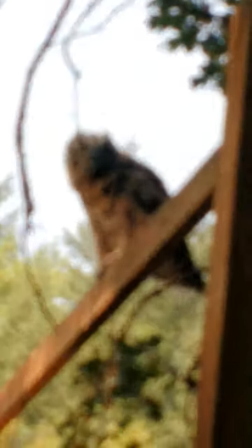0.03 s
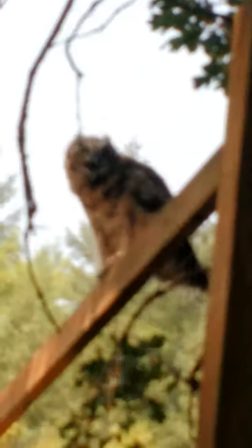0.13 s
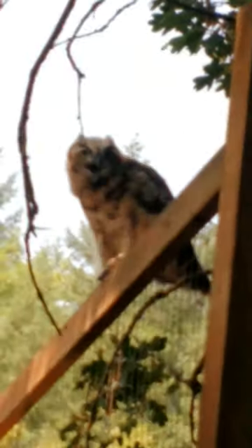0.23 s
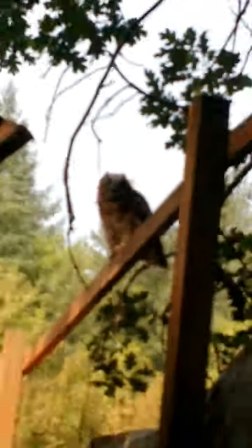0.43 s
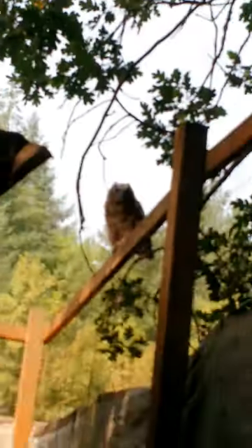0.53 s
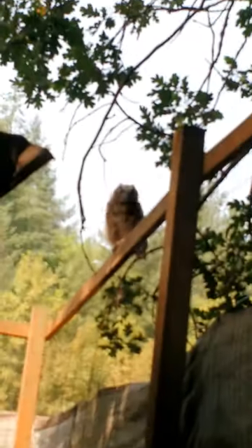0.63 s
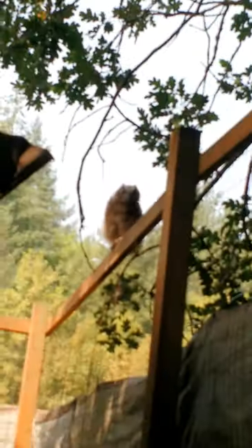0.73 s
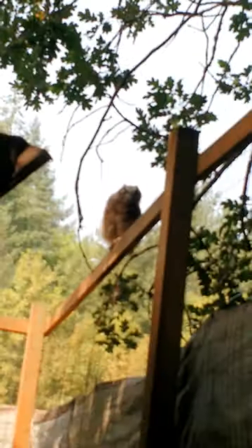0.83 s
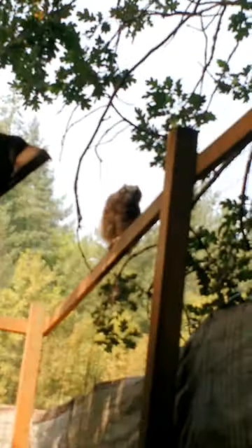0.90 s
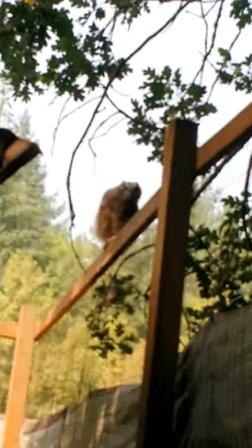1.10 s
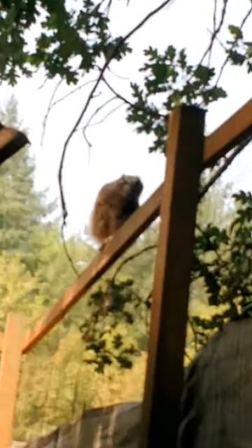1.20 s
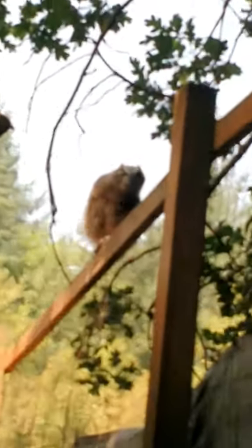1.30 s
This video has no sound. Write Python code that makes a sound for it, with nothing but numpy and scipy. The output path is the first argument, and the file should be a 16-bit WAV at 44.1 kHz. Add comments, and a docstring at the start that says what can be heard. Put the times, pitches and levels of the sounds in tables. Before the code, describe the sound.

A young owl gives one harsh, raspy screech over a quiet outdoor background.

```python
"""A stereo microphone at the edge of a wood, facing a young owl on a wooden beam.
Leaves stir over a soft far-off rush and a little wind. Then the owl gives one begging screech:
air rasps through a narrow resonance near 3 kHz, catches into a rough whistle at the height of the
call and falls away, thrown back by the beam, the yard and the trees. About a second in, a hand
softly bumps the microphone and the leaves stir once more."""
import sys
import numpy as np
from scipy import signal
from scipy.fft import rfft, irfft
from scipy.io import wavfile

SR = 44100
rng = np.random.default_rng(int(sys.argv[2]) if len(sys.argv) > 2 else 0)


def generate_wav(sig):
    """Save sig (samples, or channels by samples) to the path in sys.argv[1] as 16-bit PCM at SR."""
    pcm = np.round(np.clip(np.atleast_2d(sig).T, -1, 1) * 32767).astype(np.int16)
    wavfile.write(sys.argv[1], SR, pcm)


N = 59535
TIME = np.arange(N) / SR
LEFT_RIGHT = np.array([[1], [-1]])


# The resonance of the call, at the beak: (time [s], pitch [Hz])
CALL_PITCH = [(.16, 2500), (.178, 3078), (.245, 3162), (.28, 3091), (.34, 3045), (.37, 3170), (.387, 2956),
              (.43, 3099), (.465, 3233), (.54, 3382), (.578, 3247), (.612, 2598)]
# How hard the owl pushes: (time [s], level [dB])
CALL_EFFORT = [(.15, -64), (.168, -32.5), (.22, -24), (.28, -18), (.34, -17.5), (.46, -17.5), (.53, -19.5),
               (0.584, -22), (0.607, -31.5), (0.632, -50)]
# The whistle breaking through the rasp: (time [s], level [dB])
WHISTLE_LEVEL = [(.17, -39.5), (.225, -27), (.33, -27.5), (0.378, -28.5), (0.386, -15.5), (.425, -19),
                 (.465, -15), (0.499, -14.5), (0.548, -24), (.583, -20.5), (.61, -43.5), (.635, -80)]

def screech():
    """The owl on its beam: one push of air drives rasp and hiss, and a whistle breaks through."""
    pitch, = in_time(CALL_PITCH)
    effort_db, = in_time(CALL_EFFORT)
    whistle_db, = in_time(WHISTLE_LEVEL)
    whistling = from_db(whistle_db) * (TIME > WHISTLE_LEVEL[0][0])
    breath = from_db(effort_db) * rasp(pitch, whistling / whistling.max()) + beak_hiss(effort_db)
    sounding = (TIME > CALL_EFFORT[0][0]) & (TIME < CALL_EFFORT[-1][0])
    return sounding * (breath + whistling * whistle(pitch))


# The octave growing through the call: (time [s], level relative to the effort [dB])
OCTAVE_LEVEL = [(.17, -45.5), (.33, -23), (.45, -23.5), (.56, -21.5)]

def rasp(pitch, whistle_share, below_hz=70, lost_to_whistle=.38, beak_hz=4130):
    """Air rings just under the pitch, at the octave and in the fixed resonance of the open beak."""
    octave_db, = in_time(OCTAVE_LEVEL)
    core = from_db(-1.5) * resonant_air(pitch - below_hz, width_hz=485)
    octave = from_db(octave_db) * resonant_air(2 * pitch, width_hz=480)
    beak = from_db(-19) * resonant_air(np.full(N, beak_hz), width_hz=150)
    return core * (1 - lost_to_whistle * whistle_share) + octave + beak


AIR_FLUTTER_HZ = 166.8

def whistle(pitch, jitter_hz=33.1, shimmer_db=1.25, octave_db=-27):
    """A tone and its faint octave, roughened in pitch and level by the uneven airflow."""
    phase = turning(pitch + jitter_hz * flutter(AIR_FLUTTER_HZ))
    tone = np.sin(phase) + from_db(octave_db) * np.sin(2 * phase)
    return rms_one(tone * from_db(shimmer_db * flutter(AIR_FLUTTER_HZ)))


# Hiss at the open beak: (frequency [Hz], relative density [dB])
HISS_SPECTRUM = [(1200, -27.5), (1900, -13), (2400, -8.5), (2700, 5.5), (3300, 12.5), (3490, -3.5),
                 (3680, 7), (3920, 1), (4300, -6.5), (4650, 0.5), (5250, 0), (5500, -7.5), (5950, 2),
                 (6800, -14.5), (7800, -20), (9500, -28.5), (12000, -46), (15000, -36.5)]

def beak_hiss(effort_db, full_effort_db=-27, db_per_effort_db=.85):
    """Broad breath noise that swells and fades with the owl's effort."""
    level_db = full_effort_db + db_per_effort_db * (effort_db - effort_db.max())
    return from_db(level_db) * coloured(HISS_SPECTRUM, likeness=.95)[0]


# A faint low tone under the call: (time [s], pitch [Hz], level [dB])
UNDERTONE_CURVE = [(.24, 927, -61), (.285, 1040, -43), (.37, 1060, -45.5), (.43, 1095, -46),
                   (.52, 1191, -63)]

def undertone(jitter_hz=26.7):
    """A weak, unsteady tone near 1 kHz that rises and swells in the middle of the call."""
    pitch, level_db = in_time(UNDERTONE_CURVE)
    phase = turning(pitch + jitter_hz * flutter(AIR_FLUTTER_HZ))
    return from_db(level_db) * rms_one(np.sin(phase))


# The owl at the two microphone ports: (frequency [Hz], left lead [rad], left minus right [dB])
MIC_PORTS = [(1500, 0.5, -1), (2050, -2, -5), (2569, -2.5, -1.5), (3170, -4.5, 1.1), (3500, -4, -1),
             (3550, -4.5, 5.5), (4100, -5, -2.5), (4466, -5.5, -3), (5070, -2.5, -4), (5230, -2.5, -0.5),
             (6160, -2.5, -4), (6310, -.5, -3.5), (7300, -0.6, 9), (8200, 4, 4.5), (10000, 7.5, 4.5)]

def beam_to_microphone(call, bounce_s=.005, bounce_db=-12):
    """The call and its bounce off the timber reach each port with a different phase and level."""
    bounce = from_db(bounce_db) * np.interp(TIME - bounce_s, TIME, call, left=0)
    ports = np.array(MIC_PORTS)
    lead_rad = over_bins(ports[:, [0, 1]])
    balance_db = over_bins(ports[:, [0, 2]])
    half_each = LEFT_RIGHT / 2
    response = np.exp(1j * half_each * lead_rad) * from_db(half_each * balance_db)
    return irfft(rfft(call + bounce) * response, N)


# Echoes from the yard and the trees around the microphone:
# (delay [s], level before filtering [dB], time to fall 60 dB [s], low edge [Hz], high edge [Hz])
YARD_ECHOES = [(.004, -14.5, 0.4, 924, 7080), (0.061, -20.5, 0.52, 3310, 3847)]

def yard_echoes(call):
    """Yard and trees scatter the call into dying, band-limited tails."""
    echoes = np.zeros((2, N))
    for delay_s, level_db, t60_s, low_hz, high_hz in YARD_ECHOES:
        tail = rng.standard_normal((2, N)) * (TIME > delay_s) * from_db(-60 * TIME / t60_s)
        band = signal.butter(2, [low_hz, high_hz], "band", fs=SR, output="sos")
        tail = signal.sosfilt(band, rms_one(tail) / np.sqrt(N))
        echoes += from_db(level_db) * signal.fftconvolve(tail, call[None], axes=1)[:, :N]
    return echoes


def handling_bump(at_s=1.0325, level_db=-32, pitch_hz=268, t60_s=.012):
    """One low, quickly damped knock, right on the microphone."""
    age = np.maximum(TIME - at_s, 0)
    return from_db(level_db - 60 * age / t60_s) * np.sin(2 * np.pi * pitch_hz * age)


# Leaves stirring at the wood's edge: (peak time [s], Gaussian width [s], level [dB])
LEAF_SWELLS = [(0.057, 0.052, -56.5), (1.102, 0.029, -63)]
# Their colour at the microphone: (frequency [Hz], relative density [dB])
LEAF_SPECTRUM = [(3000, -47), (7000, -7.5), (8800, 0), (11000, -14), (15000, -2.5)]

def leaf_rustles():
    """Leaves give brief, faint swells of fine, high hiss."""
    swells = sum(from_db(level_db) * np.exp(-.5 * ((TIME - peak_s) / width_s) ** 2)
                 for peak_s, width_s, level_db in LEAF_SWELLS)
    return swells * coloured(LEAF_SPECTRUM, likeness=.37)


# The rush from far off: (frequency [Hz], relative density [dB])
RUSH_SPECTRUM = [(100, -7.5), (200, -4.5), (400, -1), (700, 2), (1020, 4), (1350, -0.5), (1700, -10),
                 (2100, -18), (2700, -25), (3400, -21.5), (4300, -25.5), (5400, -33.5), (6500, -24.5),
                 (7800, -30), (9000, -26), (11000, -31.5), (15000, -28.5)]
# How alike it is on the two channels: (frequency [Hz], left-right likeness [0 to 1])
RUSH_STEREO = [(100, 0.43), (300, .78), (700, .91), (1400, 1), (2500, 0), (5000, 0), (12000, 0)]

def distant_rush(level_db=-42.5):
    """A steady far-off rush, centred around 1 kHz and diffuse in the treble."""
    return from_db(level_db) * coloured(RUSH_SPECTRUM, over_bins(RUSH_STEREO))


# Wind on the microphone: (frequency [Hz], relative density [dB])
WIND_SPECTRUM = [(15, -1.5), (28, -1.5), (44, 1.5), (64, -7), (90, -22), (125, -10), (170, -24), (400, -31),
                 (1000, -72)]

def microphone_wind(level_db=-47.5, lean_right_db=1.4):
    """Light wind rumbles on the microphone, a little more on the right."""
    return from_db(level_db - lean_right_db * LEFT_RIGHT) * coloured(WIND_SPECTRUM, likeness=.52)


def resonant_air(pitch, width_hz):
    """Turbulence ringing in a resonance that follows the pitch; rms 1."""
    phase = turning(pitch)
    in_phase = flutter(width_hz / 2, order=3)
    quadrature = flutter(width_hz / 2, order=3)
    return rms_one(in_phase * np.cos(phase) + quadrature * np.sin(phase))


def coloured(spectrum, likeness):
    """Stereo noise of a given colour and left-right likeness; rms 1."""
    mid, side = rfft(rng.standard_normal((2, N)))
    alike = np.clip(likeness, -1, 1)
    pair = np.sqrt(1 + alike) * mid + np.sqrt(1 - alike) * side * LEFT_RIGHT
    return rms_one(irfft(pair * from_db(over_bins(spectrum)), N))


def flutter(hz, order=2):
    """Random motion up to a given rate; rms 1."""
    lowpass = signal.butter(order, hz, fs=SR, output="sos")
    return rms_one(signal.sosfilt(lowpass, rng.standard_normal(N)))


def turning(hz):
    """Running phase of a moving pitch."""
    return 2 * np.pi * np.cumsum(hz) / SR


def in_time(rows):
    """Each column of a curve, sample by sample, holding its end values."""
    times, *columns = np.transpose(rows)
    return [np.interp(TIME, times, column) for column in columns]


def over_bins(points):
    """A frequency table read at every bin of the spectrum."""
    hz, values = np.transpose(points)
    bin_hz = np.arange(N // 2 + 1) * SR / N
    return np.interp(np.log(bin_hz + 1), np.log(hz), values)


def from_db(db):
    """Decibels to gain."""
    return 10 ** (np.asarray(db) / 20)


def rms_one(x):
    """Scale to unit power."""
    return x / np.sqrt(np.mean(np.abs(x) ** 2) + 1e-20)


def scene():
    """One screech over the quiet of the yard, as it reaches the microphone."""
    call = screech() + undertone()
    owl = beam_to_microphone(call) + yard_echoes(call)
    return owl + distant_rush() + microphone_wind() + handling_bump() + leaf_rustles()


def record(dry, cutoff_hz=15400):
    """The recorder cuts the top treble steeply."""
    return signal.sosfilt(signal.ellip(12, .1, 90, cutoff_hz, fs=SR, output="sos"), dry)


dry = scene()
out = record(dry)
generate_wav(out)
```